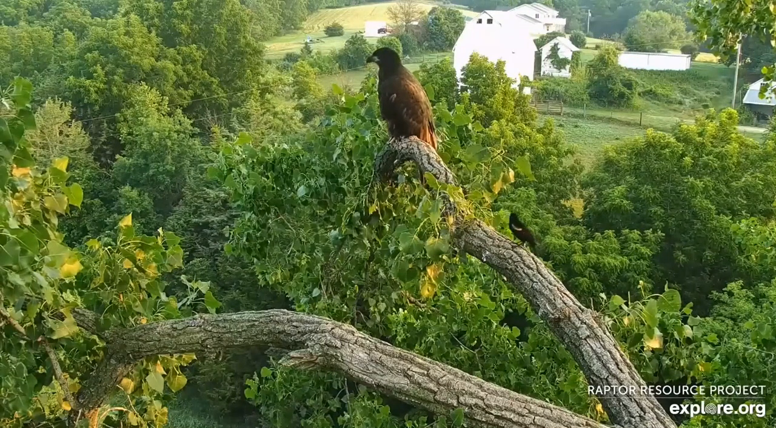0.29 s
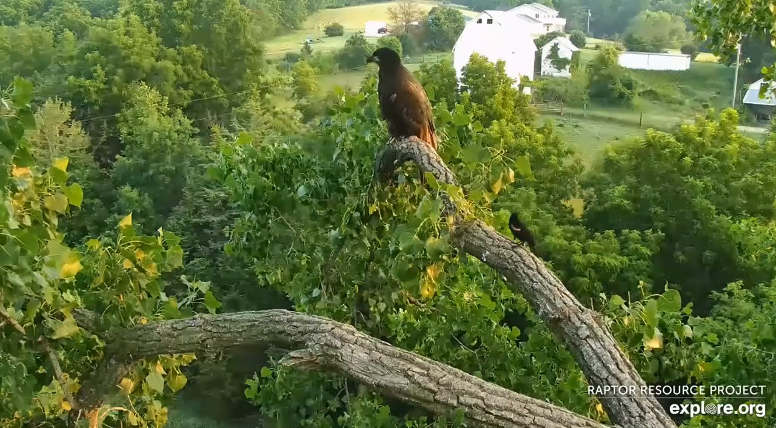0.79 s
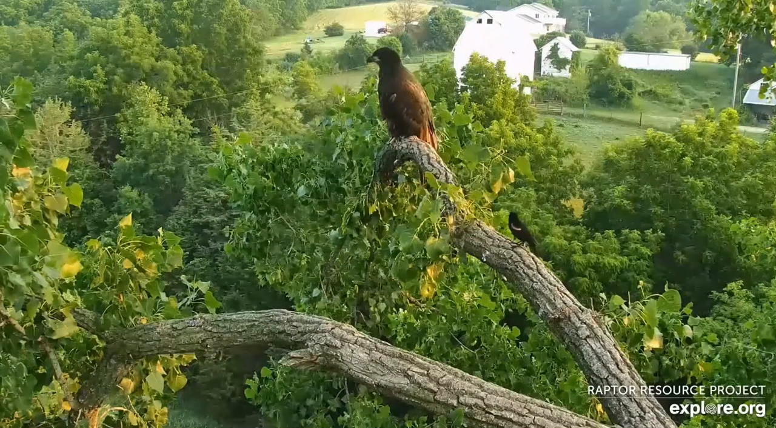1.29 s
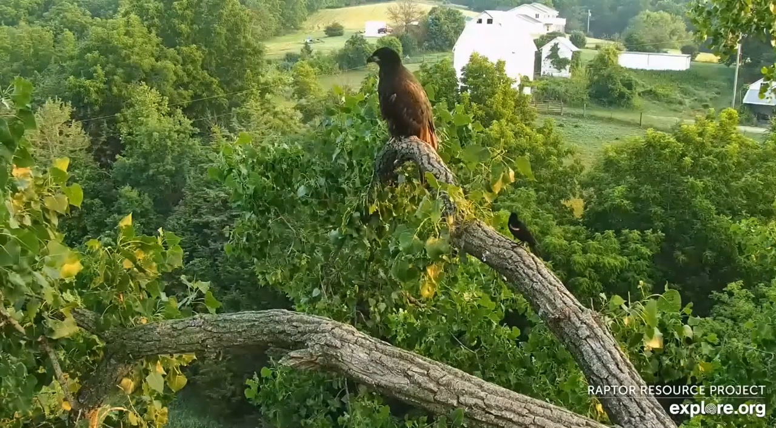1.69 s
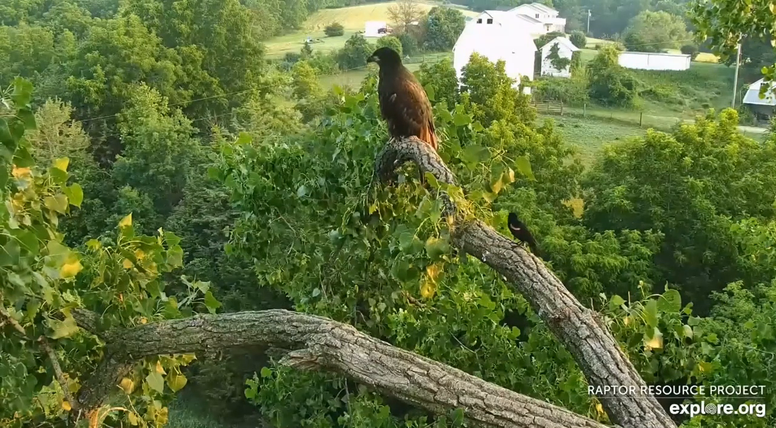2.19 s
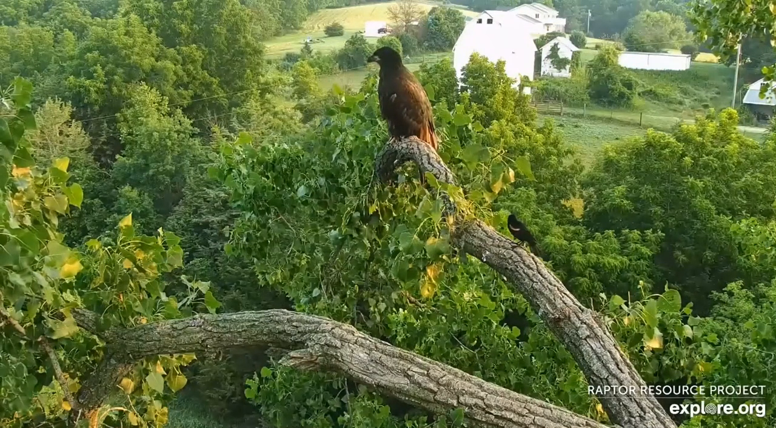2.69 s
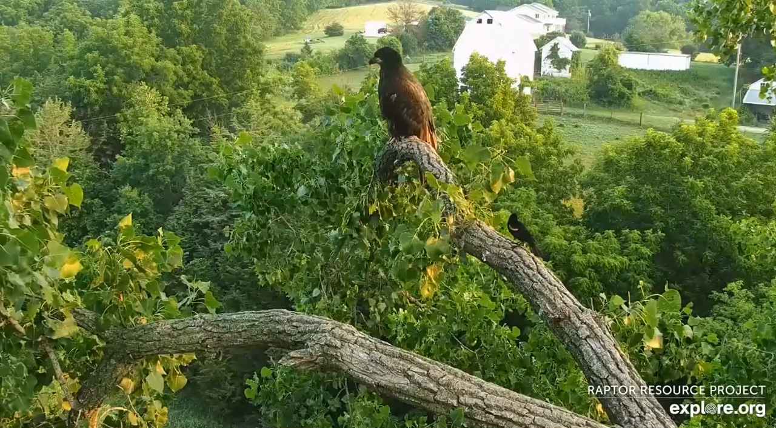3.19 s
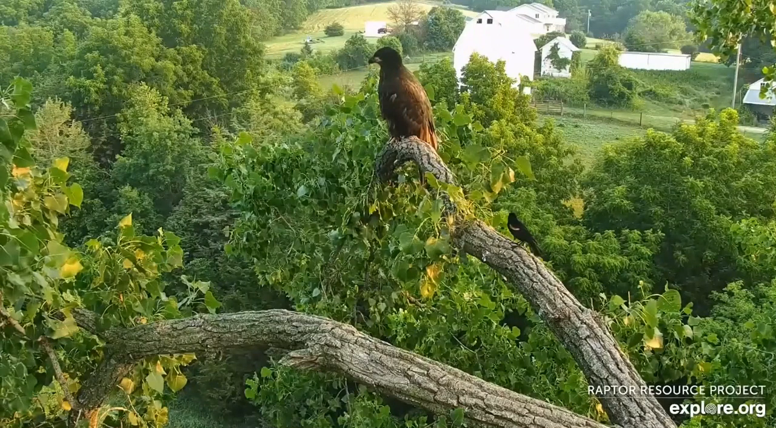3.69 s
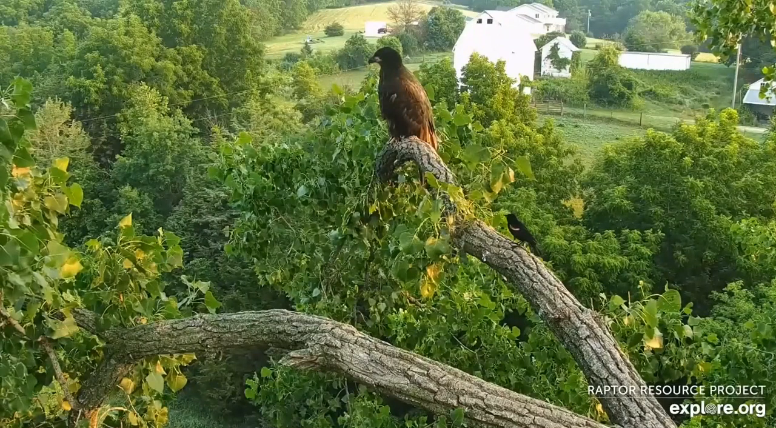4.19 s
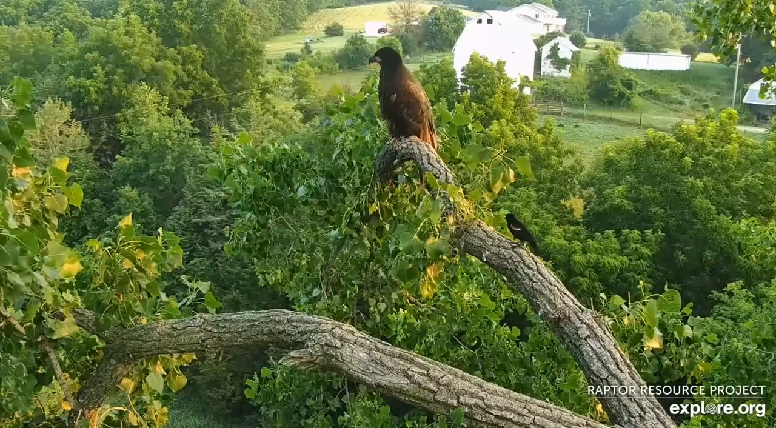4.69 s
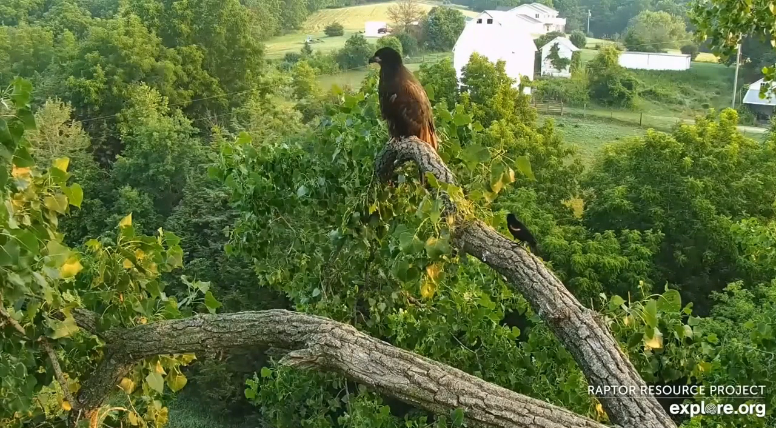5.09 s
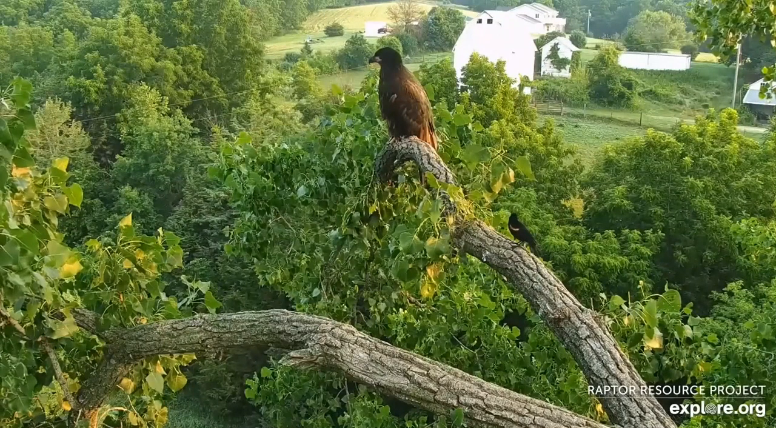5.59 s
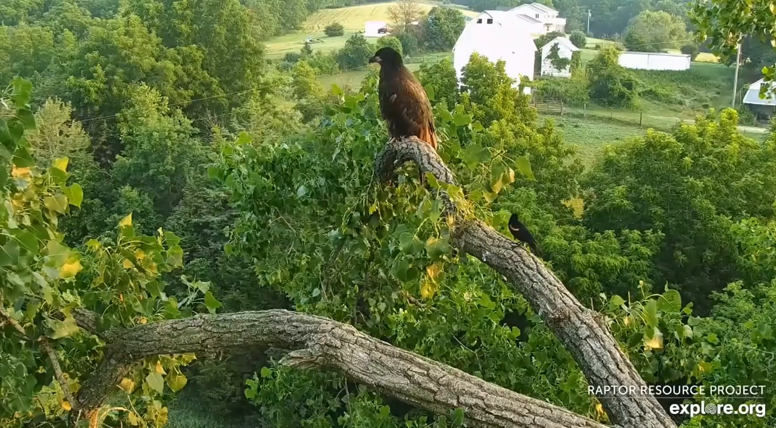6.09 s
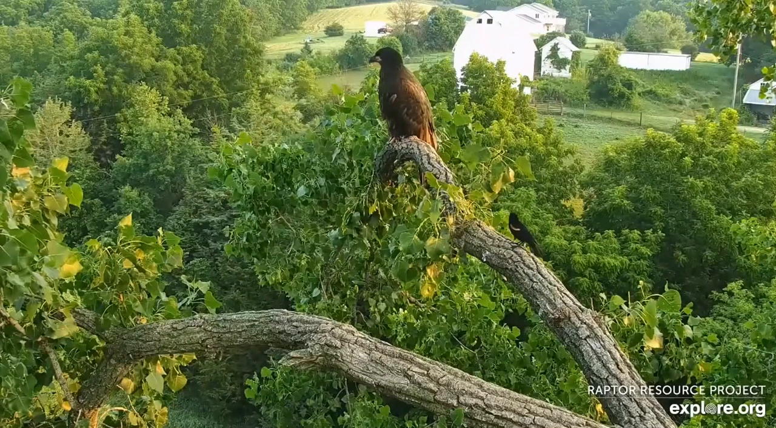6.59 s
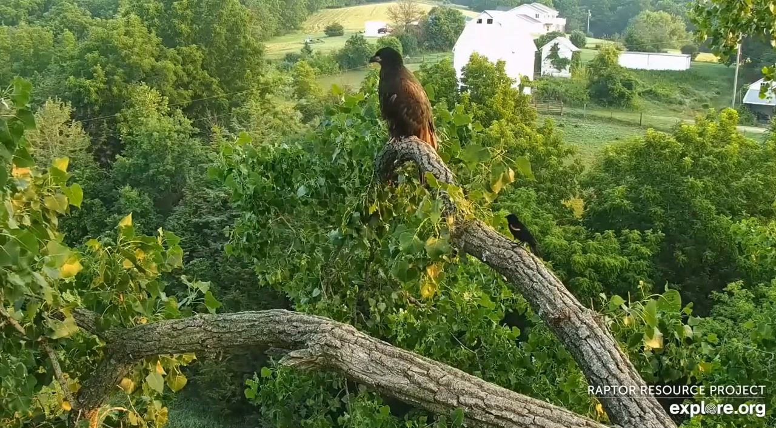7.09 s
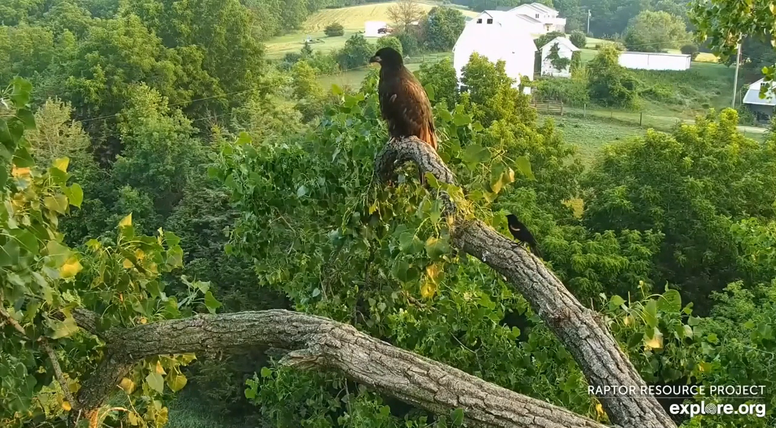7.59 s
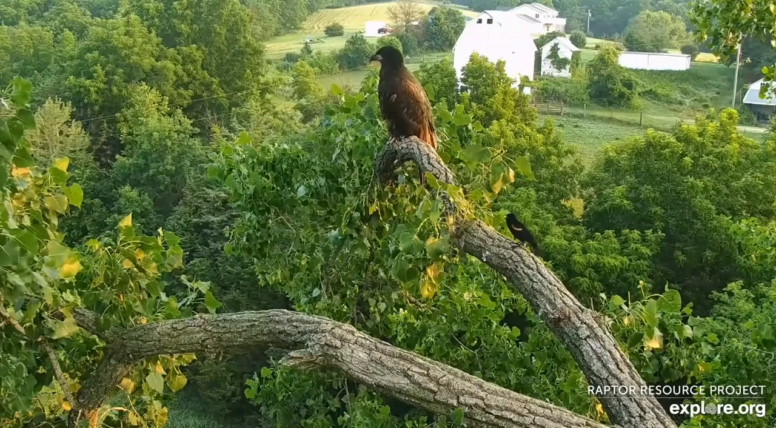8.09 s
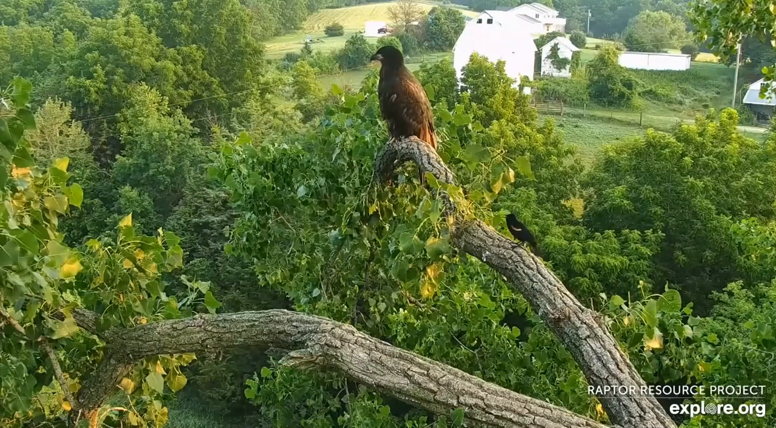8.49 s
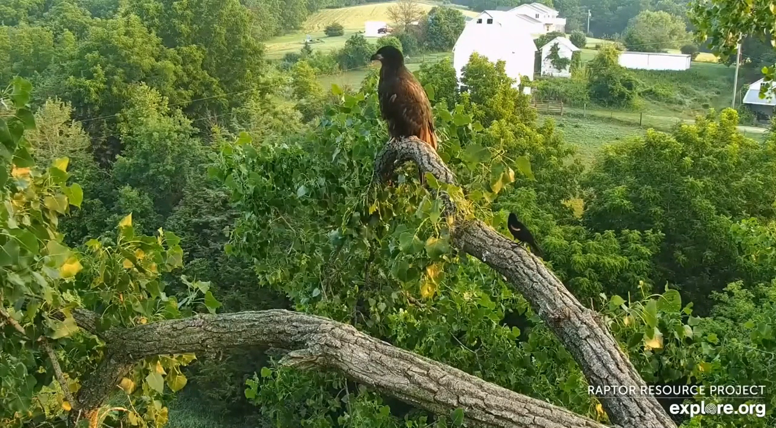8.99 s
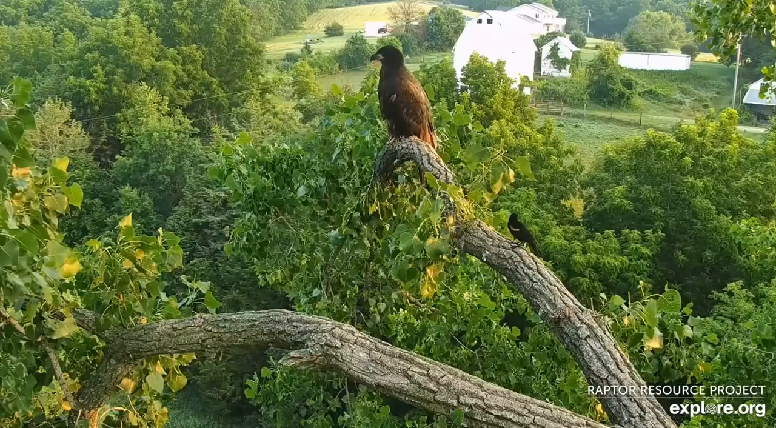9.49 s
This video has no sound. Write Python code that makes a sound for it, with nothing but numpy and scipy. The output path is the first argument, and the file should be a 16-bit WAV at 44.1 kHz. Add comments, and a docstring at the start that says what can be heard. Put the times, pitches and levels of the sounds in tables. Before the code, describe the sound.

Steady, quiet open-country rumble and soft hiss run throughout, with a blurred far bird chorus and a faint low drone coming and going, mainly in the first three seconds. A nearby young eagle gives loud, pure, piercing whistles of about 0.25 to 0.35 seconds. A high one starts almost at once, settling near 4.4 kHz; lower ones at 1.1 and 2.1 plunge from about 6 kHz towards 3.2 kHz. Two high whistles follow at 3.6 and 4.7, with quiet stepped lead-ins. A tiny rough chuck clicks at 5.9. Low falling whistles return at 6.7, 8.1 and 9.0. Leaves and hills echo briefly, and thin metallic ghost tones shadow the loud calls. Distant songbirds twitter quick slurs throughout; low pipes sound at 0.7, 1.8, 7.4, 8.0 and 8.7. Faint rasps scold around 3.3, 4.4, 5.2 and 7.7. A faint low moan enters at 9.65, near the end.

```python
"""Treetop whistler over open country

A bird close by in a treetop whistles eight piercing, falling calls and gives one short chuck; leaves and hills answer.
Farther off a songbird sings quick slurs, another bird pipes low and rasps scold, all unsteady sines or shaped noise.
Patchy noise makes the rumble and hiss of open country and a blurred chorus; a faint drone and a late moan lie under it.
A crude sample-rate converter in the camera link mirrors every loud whistle into thin ghost tones."""
import sys
import numpy as np
from scipy import signal
from scipy.fft import rfft, irfft, next_fast_len
from scipy.io import wavfile
from scipy.ndimage import uniform_filter1d, map_coordinates

SR = 44100
rng = np.random.default_rng(int(sys.argv[2]) if len(sys.argv) > 2 else 0)


def volts(x):
    """Linear amplitude factor 10**(x/20) for a level x in dB, scalar or array-like."""
    e = np.asarray(x, float) / 20
    return 10 ** e


def digitize_waveform(pressure):
    """Quantize a signal to 16-bit integers and store it at the path in sys.argv[1].

    Rows of a 2-D input are taken as channels; values are limited to [-1, 1].
    """
    field = np.atleast_2d(pressure).T
    bounded = np.clip(field, -1, 1)
    quanta = np.round(bounded * 32767).astype(np.int16)
    wavfile.write(sys.argv[1], SR, quanta)


N = 431298  # length in samples


def along(points, hz):
    """Reads a curve of (Hz, value) points on a log frequency axis."""
    f, v = np.transpose(points)
    return np.interp(np.log(hz + 1), np.log(f + 1), v)


def filtered(x, response):
    """Shapes the spectrum of x by a gain that is a function of frequency."""
    m = next_fast_len(len(x) + 8192)
    return irfft(rfft(x, m) * response(np.fft.rfftfreq(m, 1 / SR)), m)[:len(x)]


def unit(x):
    """Scales x to rms 1."""
    return x / np.sqrt(np.mean(x ** 2) + 1e-20)


def wobble(rate, count):
    """A smooth random curve with rate knots a second."""
    knots = rng.standard_normal(int(count * rate / SR) + 4)
    return map_coordinates(knots, [np.arange(count) * rate / SR])


def add(track, s, sound):
    """Mixes a sound into the track at time s."""
    part = track[round(s * SR):][:len(sound)]
    part += sound[:len(part)]


def tone(rows, waver, flutter_db, overtone_db, breath_db):
    """A sine on (s, Hz, dB) rows, unsteady in pitch and size, with a weak octave, a breathy skirt and soft ends."""
    s, hz, db = np.transpose(rows)
    t = np.arange(s[0], s[-1], 1 / SR)
    pitch = uniform_filter1d(np.interp(t, s, hz), SR // 600) * (1 + waver * wobble(220, count=len(t)))
    phase = 2 * np.pi * np.cumsum(pitch) / SR
    ends = np.clip(np.minimum(t - s[0], s[-1] - t) / 0.000646, 0, 1)
    size = volts(np.interp(t, s, db) + flutter_db * wobble(180, count=len(t))) * ends
    breath = volts(breath_db) * wobble(1600, count=len(t))  # turbulence shakes the membranes fast
    voice = np.sin(phase + breath) + volts(overtone_db) * np.sin(2 * phase)
    return np.sqrt(2) * size * voice


# how long the hills ring, highs dying sooner: pitch_hz, t60_s
HILL_DECAY = [(500, 1.5), (3300, 1.5), (4500, .9), (8000, .5)]


def echoed(x, leaves_db, leaves_s, hills_db):
    """Direct sound, a short scatter off nearby leaves and a long tail off the hills, new for every call."""
    t = np.arange(SR) / SR
    leaves = rng.standard_normal(SR) * volts(-60 * t / leaves_s)
    hz, frames, z = signal.stft(rng.standard_normal(SR), SR, nperseg=256)
    decay = volts(-60 * frames / along(HILL_DECAY, hz)[:, None])
    hills = signal.istft(z * decay, SR, nperseg=256)[1][:SR]
    hills = hills * volts(4 * wobble(30, count=len(hills)))  # slopes answer in patches
    answer = volts(leaves_db) * leaves / np.linalg.norm(leaves)
    answer = answer + volts(hills_db) * hills / np.linalg.norm(hills)
    answer[0] = 1
    return signal.fftconvolve(x, answer)


# colour of the open-country rumble and hiss: pitch_hz, relative_db_per_hz
AIR_COLOUR = [(12, -40.5), (25, -15), (40, -5), (62, 3), (120, -2.5), (250, -0.5), (500, -1), (800, -1),
              (1200, -6), (1800, -11), (2600, -16.5), (4000, -21.5), (5500, -27), (8000, -45.5),
              (10000, -120)]
# its slow swell: time_s, level_db
AIR_SWELL = [(0, -44), (1.25, -43.5), (3.65, -42.5), (6.4, -43.5), (8.6, -44.5), (9.15, -42.5), (9.78, -44)]
# colour of the blurred dawn chorus: pitch_hz, relative_db_per_hz
CHORUS_COLOUR = [(1800, -120), (2200, -5), (3000, 9.5), (4000, -5.5), (5200, -7.5), (6000, -120)]


def open_country():
    """Noise in drifting patches of time and pitch: far rumble and hiss, and a chorus too far to make out."""
    z = signal.stft(rng.standard_normal(N), nperseg=512)[2]
    field = uniform_filter1d(uniform_filter1d(rng.standard_normal(z.shape), 5, 0), 12, 1)
    patches = unit(field)
    hiss = signal.istft(z * volts(1.4 * patches), nperseg=512)[1][:N]
    hiss = filtered(hiss, lambda hz: volts(along(AIR_COLOUR, hz)))
    s, db = np.transpose(AIR_SWELL)
    level_db = np.interp(np.arange(N) / SR, s, db) + .4 * wobble(2.5, count=N)
    # the same noise backwards in time, with the patches far deeper
    chorus = signal.istft(z[:, ::-1] * volts(6.5 * patches), nperseg=512)[1][:N]
    chorus = filtered(chorus, lambda hz: volts(along(CHORUS_COLOUR, hz)))
    return unit(hiss) * volts(level_db) + volts(-57.5) * unit(chorus)


RELEASE_S, RELEASE_DB = 0.0183, 12  # the voice fades out over its last moments
DIP_DB, DIP_S = 8, 0.002  # brief dips at random moments, most of them early: mean depth and width
BREAK_DB, BREAK_OCTAVES_PER_S = 16, 35  # the voice breaks off where the pitch jumps faster than this


def whistle(levels, pitch):
    """One whistle on a level curve and a pitch law; its size beats as echoes meet the glide, and dips briefly."""
    s, db = np.transpose(levels)
    t = np.arange(s[0], s[-1], 1 / SR)
    hz = pitch(t)
    db = np.interp(t, s, db) - RELEASE_DB * np.clip(1 - (s[-1] - t) / RELEASE_S, 0, 1)
    call = tone(np.transpose([t, hz, db]), waver=.0007, flutter_db=1.1, overtone_db=-42, breath_db=-25)
    t, hz = t[:len(call)], hz[:len(call)]
    octaves_per_s = np.abs(np.gradient(np.log2(hz))) * SR
    # fast glides beat against close echoes
    beats_db = 3.5 * np.clip(octaves_per_s / 3, 0, 1) * wobble(330, count=len(t))
    at, depth, width = rng.random(size=(7, 3)).T[:, :, None]
    from_dip = t - s[0] - at ** 2 * np.ptp(s)
    dips = np.exp(-(from_dip / (DIP_S * (.5 + width))) ** 2 / 2)
    dips_db = np.sum(2 * DIP_DB * depth * dips, axis=0)
    jumps = uniform_filter1d(2.0 * (octaves_per_s > BREAK_OCTAVES_PER_S), size=SR // 150)
    dips_db = dips_db + BREAK_DB * np.clip(jumps, 0, 1)
    call = call[:len(t)] * volts(beats_db - dips_db)
    return echoed(call, leaves_db=-10.5, leaves_s=.16, hills_db=-27.5)


# high whistles of the near bird: full_voice_s, resting_pitch_hz, settle_s
HIGH_CALLS = [(.057, 4445, .165), (3.665, 4429, 0.14), (4.752, 4408, 0.15)]
# loudness, one list for each high whistle: time_s, level_db
HIGH_LOUDNESS = [
    [(0.0, -44), (0.014, -30.5), (0.054, -27), (0.062, -11), (0.082, -15), (0.096, -5.5), (0.114, -16.5),
     (0.118, -8.5), (0.222, -13.5), (0.3, -30)],
    [(3.568, -46), (3.584, -31.5), (3.638, -33.5), (3.662, -13.5), (3.798, -5), (3.878, -13.5),
     (3.9, -33.5)],
    [(4.657, -48), (4.671, -30), (4.683, -22), (4.695, -32), (4.739, -32), (4.751, -14), (4.783, -9.5),
     (4.911, -7), (4.965, -22), (4.981, -48), (4.985, -38)],
]
# their quiet stepped lead-in: from_full_voice_s, over_resting_pitch_hz
LEAD_IN_STEPS = [(-.098, 3380), (-.087, 2980), (-.07, 1610), (-.053, 1492), (-.05, 918.7), (-.025, 800),
                 (0, 498.3)]
REBOUND_HZ_PER_S = 250  # once settled, the high whistle creeps up again


def high_whistles():
    """The near bird steps down into full voice, settles on a high pitch and creeps up again."""
    out = np.zeros(N)
    for (s, rest_hz, settle_s), levels in zip(HIGH_CALLS, HIGH_LOUDNESS):
        def fall(t):
            steps_hz = np.interp(t - s, *np.transpose(LEAD_IN_STEPS))
            settling = np.clip(1 - (t - s) / settle_s, 0, 1) ** 2
            return rest_hz + steps_hz * settling + REBOUND_HZ_PER_S * np.clip(t - s - settle_s, 0, 1)
        add(out, levels[0][0], whistle(levels, fall))
    return out


# songbird phrases of hooked falling notes: first_s, last_s, hook_from_hz, fall_to_hz, level_db
HOOKED_PHRASES = [(0.274, .618, 3500, 2294, -51), (2.022, 2.465, 3900, 2630, -47),
                  (3.876, 4.236, 3500, 2346, -50), (5.55, 5.773, 3850, 2700, -51.5),
                  (7.177, 7.541, 3550, 2470, -51), (8.859, 8.964, 3950, 2434, -46)]
NOTE_GAP_S, HOOK_S, FALL_HZ_PER_S, CREST_HZ = .115, .02, 34000, 3950
CHATTER_DB, CHATTER_HZ, CHATTER_S = -62, 3400, .035  # faint slurs: top level, base of the pitch spread, length
# lone slurs: start_s, length_s, from_hz, to_hz, level_db
LONE_SLURS = [(.599, .027, 5380, 4255, -59), (.98, 0.027, 3800, 2690, -54),
              (1.743, 0.045, 3990, 2940, -54.5), (3.1, 0.047, 3400, 3080, -63),
              (3.143, .031, 2864, 2960, -54), (3.19, .043, 3510, 2880, -57.5), (3.37, .12, 4470, 4430, -63),
              (3.595, 0.043, 3700, 2900, -48), (4.17, 0.024, 3220, 3001, -50.5),
              (4.22, 0.021, 3170, 3013, -49.5), (5.46, 0.056, 3070, 2864, -55),
              (6.067, .044, 5180, 5600, -61.5), (7.202, 0.048, 5015, 4560, -57),
              (7.598, 0.025, 3980, 3360, -64), (8.655, .03, 2880, 1980, -57)]
# paired slurs in three shapes: after_start_s, length_s, from_hz, to_hz, over_note_db
SEESAW_SHAPE = [(0, .033, 2856, 4090, -0.5), (.065, 0.035, 5580, 4010, -6)]
OPENER_SHAPE = [(0, .02, 4084, 5100, 1), (.022, 0.034, 4674, 2420, 2.5)]
FLICK_SHAPE = [(0, .03, 4510, 4820, 1), (.03, 0.0186, 4800, 5870, -6)]
# when each shape is sung: start_s, level_db
SEESAW_NOTES = [(.69, -53), (.83, -52.5), (6.385, -54.5), (6.532, -53)]
OPENER_NOTES = [(1.89, -46), (5.418, -50), (5.968, -53), (8.725, -49)]
FLICK_NOTES = [(7.142, -50), (7.258, -55)]


def song():
    """Lists every slur as start_s, length_s, from_hz, to_hz, level_db: phrases, pairs, lone slurs, chatter."""
    slurs = list(LONE_SLURS)
    for first, last, hook_hz, low_hz, db in HOOKED_PHRASES:
        fall_s = (CREST_HZ - low_hz) / FALL_HZ_PER_S
        for s in np.linspace(first, last, round((last - first) / NOTE_GAP_S) + 1):
            slurs.append((s - HOOK_S, HOOK_S, hook_hz, CREST_HZ, db - 2.5))
            slurs.append((s, fall_s, CREST_HZ, low_hz, db))
    pairs = (OPENER_SHAPE, OPENER_NOTES), (SEESAW_SHAPE, SEESAW_NOTES), (FLICK_SHAPE, FLICK_NOTES)
    for shape, notes in pairs:
        for s, db in notes:
            slurs += [(s + after, *slur, db + over_db) for after, *slur, over_db in shape]
    for at, height, fall, size in rng.random(size=(30, 4)):  # chatter at random moments
        hz = CHATTER_HZ * (.75 + .55 * height)
        start_s = .3 + at * (N / SR - .4)
        slurs.append((start_s, CHATTER_S, hz, hz * (1.05 - .35 * fall), CHATTER_DB - 6 * size))
    return slurs


def songbird():
    """Each slur is a breathy gliding sine from another tree, half lost in echo."""
    out = np.zeros(N)
    for s, length, from_hz, to_hz, db in song():
        middle_hz = .47 * from_hz + .53 * to_hz
        rows = [(s - .006, from_hz, db - 4), (s, from_hz, db - 1),
                (s + .4 * length, middle_hz, db), (s + length, to_hz, db - 2)]
        slur = tone(rows, waver=.007, flutter_db=2.5, overtone_db=-33, breath_db=-10)
        add(out, rows[0][0], echoed(slur, leaves_db=-1, leaves_s=.22, hills_db=-5))
    return out


# faint drone: start_s, end_s, pitch_hz, level_db
DRONE_NOTES = [(0.299, .85, 320.1, -51), (1.348, 2.3, 312.4, -51.5), (2.299, 3.4, 313, -55),
               (8.547, 9.0, 329, -56)]


def drone():
    """A faint wavering low tone with a strong octave comes and goes."""
    out = np.zeros(N)
    for start, end, hz, db in DRONE_NOTES:
        rows = [(start, hz, db + 2), (start + 0.046, hz, db), (end - .15, hz, db), (end, hz, db - 11)]
        add(out, start, tone(rows, waver=0.022, flutter_db=2.5, overtone_db=-10, breath_db=-25.0))
    return out


# low piping notes: start_s, length_s, start_hz, crest_hz, end_hz, level_db
PIPING = [(.69, .23, 1560, 1860, 1850, -46), (1.795, .2, 1810, 1930, 1790, -45.5),
          (7.365, .07, 1960, 2090, 1950, -49), (8.005, .087, 1950, 2030, 1880, -48),
          (8.695, .077, 1980, 2050, 2100, -45)]


def piping_bird():
    """Low notes from another tree scoop up to a crest, as breathy sines in echo."""
    out = np.zeros(N)
    for s, length, start_hz, crest_hz, end_hz, db in PIPING:
        rows = [(s, start_hz, db - 6), (s + .22 * length, crest_hz, db),
                (s + .7 * length, (crest_hz + end_hz) / 2, db - 1), (s + length, end_hz, db - 6)]
        pipe = tone(rows, waver=.017, flutter_db=2.5, overtone_db=-30, breath_db=-9)
        add(out, s, echoed(pipe, leaves_db=-2, leaves_s=.15, hills_db=-12))
    return out


# low whistles of the near bird: start_s, resting_pitch_hz, slow_drop_hz
LOW_CALLS = [(1.105, 3182, 900), (2.086, 3225, 584), (6.702, 3225, 721), (8.127, 3248, 598),
             (9.043, 3170, 760)]
# loudness, one list for each low whistle: time_s, level_db
LOW_LOUDNESS = [
    [(1.1, -56.5), (1.124, -22.5), (1.17, -13), (1.284, -15), (1.296, -12), (1.326, -21.5), (1.366, -14.5),
     (1.398, -29), (1.41, -17), (1.44, -58)],
    [(2.082, -51), (2.102, -25.5), (2.128, -14.5), (2.27, -14), (2.304, -19), (2.316, -33), (2.334, -19),
     (2.376, -20.5), (2.404, -31), (2.415, -48)],
    [(6.698, -51), (6.72, -24), (6.746, -15.5), (6.864, -12.5), (6.876, -17.5), (6.91, -12), (6.964, -24),
     (6.976, -16), (6.998, -32), (7.03, -18)],
    [(8.12, -59), (8.134, -23), (8.192, -11), (8.226, -12), (8.256, -23), (8.308, -13.5), (8.316, -11),
     (8.398, -10), (8.426, -16), (8.45, -40)],
    [(9.034, -52), (9.048, -35.5), (9.08, -14.5), (9.186, -12), (9.2, -20), (9.214, -14), (9.276, -21),
     (9.28, -33.5), (9.318, -12), (9.375, -38)],
]
LOW_TOP_HZ, ROLL = 6315, 9  # ceiling of the pitch; a higher roll turns the corner more sharply
FAST_HZ, FAST_S, SLOW_S = 5100, .02, .1  # size of the fast drop, time constants of both drops


def low_whistles():
    """The near bird's pitch rolls over the top, drops fast, then sags slowly to rest."""
    out = np.zeros(N)
    for (s, rest_hz, slow_hz), levels in zip(LOW_CALLS, LOW_LOUDNESS):
        def fall(t):
            drop_hz = FAST_HZ * np.exp((s - t) / FAST_S) + slow_hz * np.exp((s - t) / SLOW_S)
            return (LOW_TOP_HZ ** -ROLL + (rest_hz + drop_hz) ** -ROLL) ** (-1 / ROLL)
        add(out, levels[0][0], whistle(levels, fall))
    return out


# far scolding rasps: start_s, length_s, centre_hz, width_hz, level_db
SCOLDS = [(5.168, .15, 2600, 1600, -47), (7.66, .3, 2950, 350, -54), (3.345, .08, 2300, 700, -52),
          (4.37, .1, 2200, 800, -52)]


def rasps():
    """Throbbing, fading noise through one resonance, scolding from other trees in echo."""
    out = np.zeros(N)
    for s, length, hz, width_hz, db in SCOLDS:
        t = np.arange(round(length * SR)) / SR
        throb = rng.standard_normal(len(t)) * volts(2.5 * wobble(60, count=len(t)) - 30 * t)
        rasp = unit(filtered(throb, lambda f: 1 / (1 + (2 * (f - hz) / width_hz) ** 2)))
        rasp = volts(db) * rasp * signal.windows.tukey(len(t), .06)
        add(out, s, echoed(rasp, leaves_db=-8, leaves_s=0.197, hills_db=-7.0))
    return out


# the chuck, a fast falling rough note: time_s, pitch_hz, level_db
CHUCK_NOTE = [(5.866, 3700, -38), (5.8735, 3450, -32), (5.875, 3200, -17), (5.879, 2800, -18),
              (5.8815, 2200, -24), (5.8825, 3000, -17), (5.885, 2950, -19), (5.888, 3050, -32)]


def chuck():
    """The near bird's rough falling note, with a puff of noise as the bill snaps open."""
    out = np.zeros(N)
    note = tone(CHUCK_NOTE, waver=.015, flutter_db=1, overtone_db=-25, breath_db=-13)
    t = np.arange(len(note)) / SR
    snap = filtered(rng.standard_normal(len(t)), lambda hz: 1 / (1 + ((hz - 2000) / 700) ** 2))
    note = note + volts(-30.0) * unit(snap) * np.exp(-((t - .008) / 0.0032) ** 2)
    add(out, CHUCK_NOTE[0][0], echoed(note, leaves_db=-4.0, leaves_s=0.17, hills_db=-27.5))
    return out


# late low moan: time_s, pitch_hz, level_db
MOAN_NOTE = [(9.64, 171, -60), (9.69, 172, -44), (9.715, 172, -50), (9.74, 174, -43), (9.78, 178, -48)]


def moan():
    """A nearly steady low tone with a strong octave, close to the end."""
    out = np.zeros(N)
    add(out, MOAN_NOTE[0][0], tone(MOAN_NOTE, waver=.005, flutter_db=.5, overtone_db=-7, breath_db=-40))
    return out


def scene():
    """Everything that reaches the microphone."""
    near_bird = high_whistles() + low_whistles() + chuck()
    far_birds = songbird() + piping_bird() + rasps()
    country = open_country() + drone() + moan()
    return (near_bird + far_birds + country)[None]


MIC_RATE, LINK_RATE, CAMERA_RATE = 16000, 48000, 22050  # samples a second
# last filters of the link: pitch_hz, gain_db
LINK_EDGE = [(20, -7), (60, -2.5), (150, 0.5), (9000, 0), (10500, -1), (11200, -21.5), (11500, -58),
             (12000, -120)]


def link(x, image_db, tilt_db):
    """Rate changes with poor filters: weak images round the first rate, then samples are picked unfiltered."""
    fast = signal.resample_poly(x, LINK_RATE // 300, SR // 300)
    turn = 2 * np.pi * MIC_RATE / LINK_RATE * np.arange(len(fast))
    analytic = signal.hilbert(fast, next_fast_len(len(fast)))[:len(fast)]
    below = np.real(np.conj(analytic) * np.exp(1j * turn))  # mirrored under the first rate
    above = 2 * fast * np.cos(turn) - below
    fast = fast + volts(image_db) * below + volts(image_db + tilt_db) * above
    picked = fast[np.arange(N // 2) * LINK_RATE // CAMERA_RATE]
    stuffed = np.zeros(N)
    stuffed[:N // 2 * 2:2] = 2 * picked  # zeros between samples double the rate
    return filtered(stuffed, lambda hz: volts(along(LINK_EDGE, hz)))


def band_limit(x):
    """A steep low-pass at the top of the band."""
    return signal.sosfilt(signal.butter(12, 11200, fs=SR, output="sos"), x)


def record(dry):
    """The preamp flattens the loudest peaks, whose third harmonic folds back in the link."""
    flattened = dry[0] / (1 + np.abs(dry[0] / .54) ** 10) ** (1 / 10)
    mix = link(flattened, image_db=-26, tilt_db=-12)[None]
    return band_limit(mix)


dry = scene()
out = record(dry)
digitize_waveform(out)
```